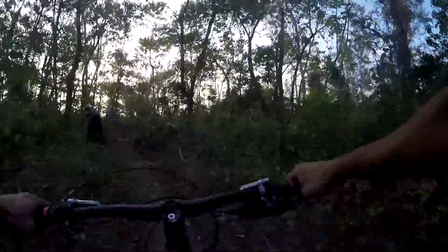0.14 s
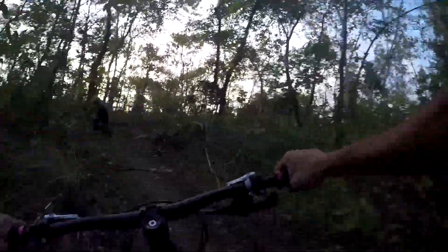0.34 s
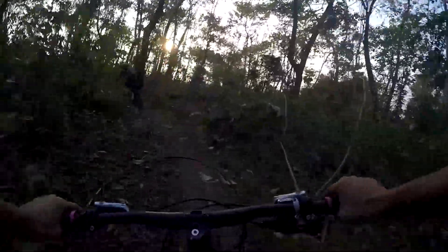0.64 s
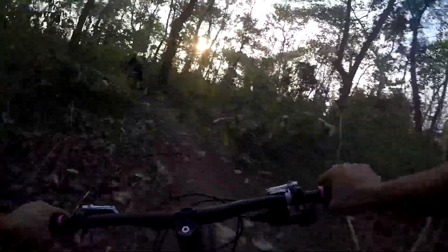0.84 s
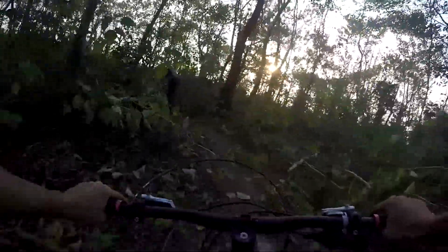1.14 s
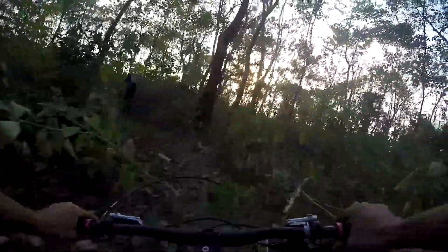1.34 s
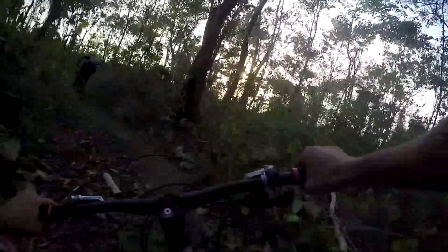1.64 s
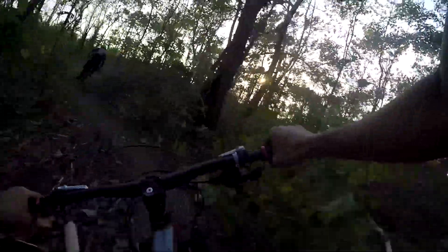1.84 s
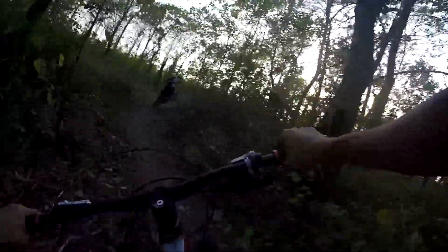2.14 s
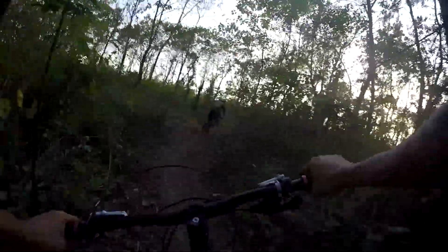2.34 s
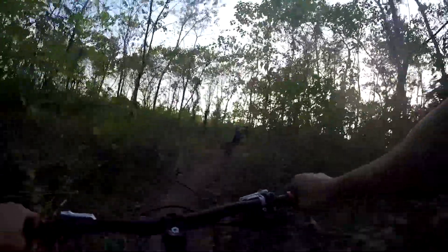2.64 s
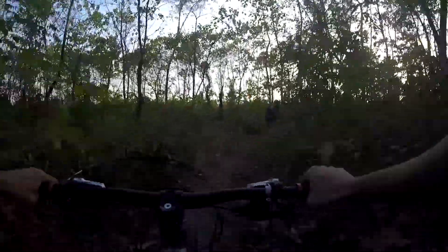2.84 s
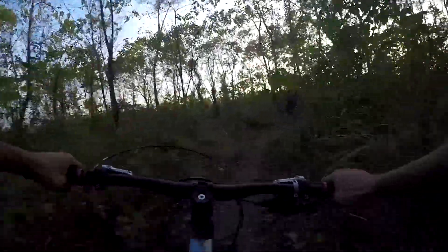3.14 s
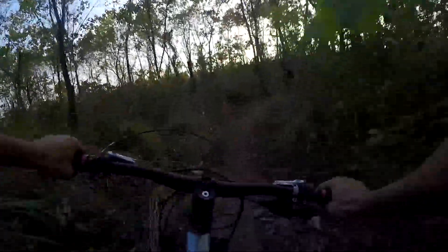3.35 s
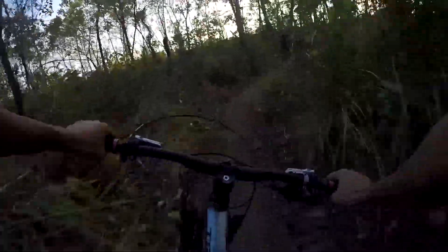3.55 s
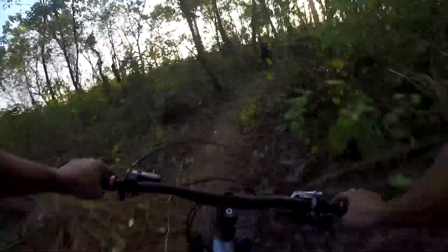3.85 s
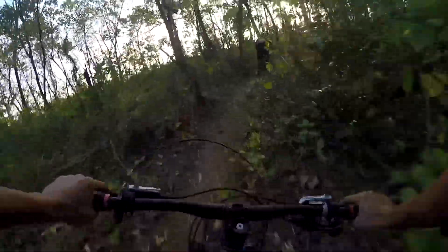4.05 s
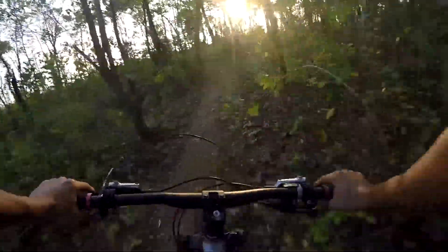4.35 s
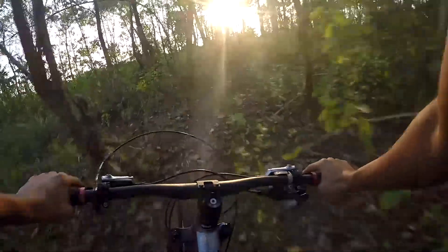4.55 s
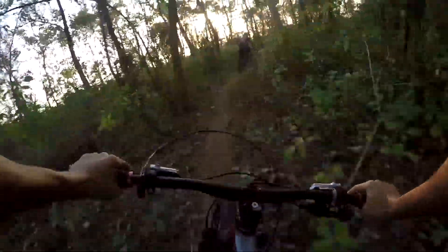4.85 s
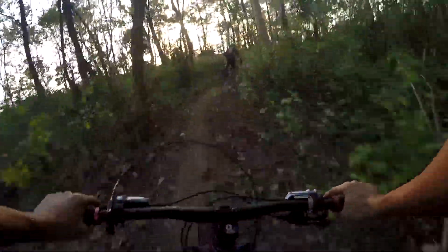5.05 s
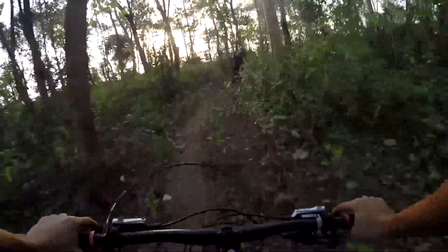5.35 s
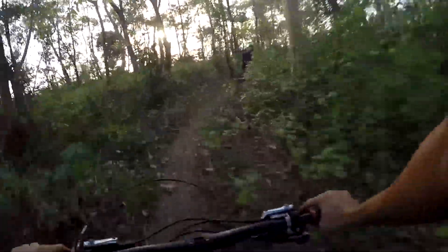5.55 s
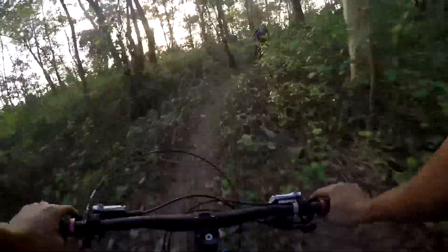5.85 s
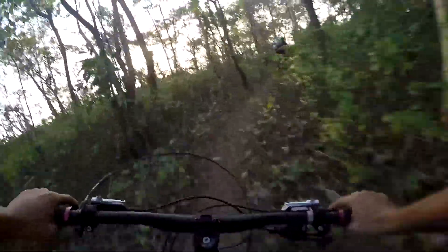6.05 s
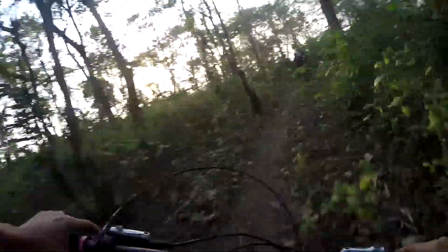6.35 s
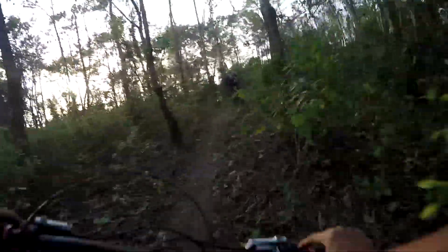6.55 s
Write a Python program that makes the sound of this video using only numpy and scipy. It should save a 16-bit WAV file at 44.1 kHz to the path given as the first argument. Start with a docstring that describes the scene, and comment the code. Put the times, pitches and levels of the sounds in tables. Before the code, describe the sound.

A mountain bike rides a rough dirt trail, heard close and without echo from the rider's chest. Throughout, the microphone rumbles and thumps deeply about three times a second, strongest near 1.9, 3.2, 4.6 and 5.9 seconds. Underneath, tyres crunch softly over grit, pebbles and dry leaves, with a faint hiss. The frame knocks irregularly, with sharp hits around 0.3, 0.8 and 1 second. From 0.4 to 2.4 seconds the bike coasts, the freehub whirring quietly and the slack chain jingling. A hard clack and a dull fork clunk land at 2.3 to 2.4 seconds, and another knock at 2.8. Coasting resumes from 3.3 to 6.1 seconds, with dense chain rattle, knocks and short leaf swishes between 3.4 and 4.1. More knocks come around 4.8, a bright steel clink at 5.1, and a sharp clack at 6.2, with the ride continuing to about 6.7 seconds.

```python
"""A mountain bike rides down a rough dirt trail, heard from a camera worn on the rider's chest.
Tyres crunch and leaves brush past, each a sum of many tiny impacts. The shaken camera rumbles, sways,
and thumps evenly three times a second. While the pedals rest, the freehub's pawls whirr over their
ratchet and the slack chain jingles. Blows send bending waves through the frame as knocks, the chain
and fittings ring in damped modes, and the fork clunks at heavy hits."""
import sys
import numpy as np
from scipy import signal
from scipy.fft import rfft, irfft
from scipy.io import wavfile
from scipy.ndimage import uniform_filter1d

SR = 44100
rng = np.random.default_rng(int(sys.argv[2]) if len(sys.argv) > 2 else 0)


def generate_wav(signal):
    """Clip the signal to [-1, 1] and save it as 16-bit WAV at the path in sys.argv[1]."""
    frames = np.transpose(np.atleast_2d(signal))
    scaled = np.clip(frames, -1, 1) * 32767
    pcm = np.round(scaled).astype(np.int16)
    wavfile.write(sys.argv[1], SR, pcm)


N = 295029
TIME = np.arange(N) / SR

# how hard the bike runs over the ground: time_s, level_db
GROUND = [(0.0, -55.5), (0.58, -58.5), (0.95, -57), (1.25, -57), (1.9, -52), (2.08, -57), (2.31, -55),
          (2.63, -53), (2.98, -56), (3.61, -49.5), (4.32, -55), (4.79, -52.5), (5.65, -57.5), (6.18, -57),
          (6.54, -52.5), (6.69, -51.5)]
# spans in which the pedals rest: start_s, end_s, rise_s, fall_s, slack_jingle_db
COASTING = [(0.425, 2.414, 0.048, 0.056, -57.5), (3.3, 6.09, 0.15, 0.12, -55)]
# blows to the frame: start_s, level_db, pitch_hz
KNOCKS = [(0.316, -21.5, 654), (0.398, -45.5, 557), (0.44, -42, 1700), (0.653, -39.5, 730),
          (0.682, -42, 770), (0.761, -20.5, 960), (0.792, -25, 430), (0.812, -29.5, 550),
          (1.002, -35, 1310), (1.025, -16, 1960), (1.196, -29, 1424), (1.239, -30.5, 2010),
          (1.382, -31, 930), (1.429, -35.5, 950), (1.465, -33.5, 1500), (1.748, -28.5, 1930),
          (1.98, -32, 1600), (2.05, -32, 1110), (2.093, -36.5, 1310), (2.3, -14.5, 1353), (2.405, -29, 870),
          (2.426, -18.5, 1034), (2.464, -36.5, 430), (2.61, -34.5, 510), (2.714, -36, 600),
          (2.783, -39.5, 450), (2.7989, -17, 670), (2.888, -34, 2070), (3.001, -38, 1590),
          (3.047, -24.5, 1030), (3.335, -32, 700), (3.528, -37.5, 435), (3.567, -32, 610),
          (3.592, -28, 1910), (3.675, -34, 900), (3.729, -25.5, 860), (3.74, -29.5, 1190),
          (3.838, -17, 1110), (3.879, -25.5, 420), (3.894, -28.5, 664), (4.076, -19.5, 1730),
          (4.086, -30.5, 700), (4.361, -35, 1720), (4.384, -23.5, 610), (4.522, -36, 740),
          (4.669, -21, 1110), (4.796, -19.5, 1110), (4.846, -21.5, 710), (5.027, -38, 910),
          (5.035, -35.5, 690), (5.519, -24.5, 620), (5.746, -30.5, 614), (6.078, -26, 1870),
          (6.153, -25, 1020), (6.213, -19.5, 1280), (6.385, -31, 436), (6.424, -34, 1290),
          (6.509, -29, 1270), (6.667, -36.5, 900)]


def amp(db):
    """Amplitude ratio of a level in decibels."""
    return 10 ** (np.asarray(db) / 20)


def unit_rms(x):
    """Normalisation to rms 1."""
    return x / np.sqrt(np.mean(x ** 2) + 1e-20)


def unit_in_band(x, low_hz, high_hz):
    """Normalisation to rms 1 within one frequency band."""
    hz = np.fft.rfftfreq(N, 1 / SR)
    return x / np.std(irfft(rfft(x) * ((hz > low_hz) & (hz < high_hz))))


def add(mix, start_s, sound):
    """Superposition: a sound joins the mix at its start time."""
    part = mix[max(round(start_s * SR), 0):][:len(sound)]
    part += sound[:len(part)]


def band(x, low_hz, high_hz):
    """Butterworth band-pass filter."""
    return signal.sosfilt(signal.butter(2, [low_hz, high_hz], "band", fs=SR, output="sos"), x)


def coloured(x, spectrum, size=16384):
    """Minimum-phase filter with a spectrum given as rows of frequency_hz, gain_db."""
    hz, db = np.transpose(spectrum)
    bins_hz = abs(np.fft.fftfreq(size, 1 / SR))
    log_gain = np.log(amp(np.interp(np.log(bins_hz + 1), np.log(hz + 1), db)) + 1e-6)
    response = np.fft.ifft(np.exp(np.conj(signal.hilbert(log_gain)))).real
    return signal.oaconvolve(x, response[:size // 2])[:N]


def level(curve):
    """Amplitude envelope interpolated through rows of time_s, level_db."""
    time_s, db = np.transpose(curve)
    return amp(np.interp(TIME, time_s, db))


def swell(surges):
    """Amplitude envelope as a sum of Gaussian surges."""
    return sum(amp(db) * np.exp(-(2 * (TIME - centre) / length) ** 2) for centre, db, length in surges)


def ground_drive(exponent):
    """Power law: a gain near 1 that follows the run over the ground."""
    return unit_rms(level(GROUND)) ** exponent


def coasting(start_s, end_s, rise_s, fall_s):
    """Trapezoidal gate: 1 while the pedals rest, 0 while they drive."""
    return np.clip(np.minimum((TIME - start_s) / rise_s, (end_s - TIME) / fall_s), 0, 1)


def wander(top_hz):
    """Slow random fluctuation: low-passed noise of rms 1."""
    slow = np.fft.rfftfreq(N, 1 / SR) < top_hz
    return unit_rms(irfft(rfft(rng.standard_normal(N)) * slow, N))


def grains(per_s, spread_db):
    """Poisson process of clicks, mostly small, a few large; rms 1."""
    size = amp(spread_db * np.minimum(rng.exponential(1, N), 4.5))
    return unit_rms(size * rng.choice([-1, 1], N) * (rng.random(N) < per_s / SR))


def ring(modes, t, weights):
    """Free vibration: a weighted sum of decaying modes in random polarity."""
    weights = weights * rng.choice([-1, 1], len(modes))
    return sum(weight * amp(db - 60 * t / t60) * np.sin(2 * np.pi * hz * t)
               for weight, (hz, db, t60) in zip(weights, modes))


def thud(hz, decay_s):
    """A heavily damped oscillator gives one dull push; peak 1."""
    t = np.arange(SR // 12) / SR
    sound = np.sin(2 * np.pi * hz * t) * np.exp(-t / decay_s) * (1 - np.exp(-t * hz))
    return sound / sound.max()


def rocking(blows, rise_s=0.013, decay_s=0.024):
    """Envelope of damped motion: the camera rocks on briefly after each blow (start_s, level_db)."""
    out, t = np.zeros(N), np.arange(SR) / SR
    for start_s, db in blows:
        add(out, start_s, amp(db) * np.minimum(t / rise_s, 1) * np.exp(-t / decay_s))
    return out


def camera(first_thump_s=0.2555, period_s=0.3305, crest_s=0.018, settle_hz=28, glide_s=0.032):
    """Forced vibration: the camera rumbles, and its mount thumps evenly, perhaps to the rider's pulse."""
    # spectrum of the rumble: frequency_hz, gain_db
    spectrum = [(9, -36), (15, 3), (30, 1.5), (42, -11), (58, -13), (85, -17), (130, -61.5), (300, -97),
                (600, -100)]
    # continuous shaking: time_s, level_db
    shake = [(0.0, -44), (0.8, -33), (1.04, -31), (1.23, -39), (1.73, -29.5), (1.93, -31), (2.25, -38.5),
             (2.76, -31), (4.55, -34), (5.07, -42), (5.5, -32), (5.85, -31), (6.07, -38.5), (6.69, -32)]
    # each thump in turn, the second of every four the strongest: level_db
    thumps_db = [-19.5, -12.5, -18, -23, -21.5, -5.5, -18, -20, -13, -3.5, -13.5, -21, -24.5, -7.5, -19.5,
                 -29, -18, -6, -11, -30]
    rumble = coloured(rng.standard_normal(N), spectrum)
    rumble /= np.sqrt(uniform_filter1d(rumble ** 2, size=3000) + 1e-20)  # hold its running rms at 1
    thumps = [(first_thump_s + k * period_s, db) for k, db in enumerate(thumps_db)]
    rock = np.hypot(amp(-8.5) * rocking(thumps), amp(-3.5) * rocking(row[:2] for row in KNOCKS))
    out = np.hypot(amp(5) * level(shake), rock) * rumble
    t = np.arange(SR // 3) / SR
    push = (t / crest_s * np.exp(1 - t / crest_s)) ** 2.5
    for start_s, db in thumps:
        start_hz = 47.9 * 2 ** (-(db + 11.5) / 28.5)  # an octave deeper for every 28.5 dB harder
        turns = np.cumsum(settle_hz + (start_hz - settle_hz) * np.exp(-t / glide_s)) / SR
        add(out, start_s, amp(db - 1) * push * np.sin(2 * np.pi * turns))
        add(out, start_s + 0.0062, amp(-31) * thud(hz=101, decay_s=0.0074))
    return out


def tyres(drone_db=-53, twig_db=-14):
    """Shot noise: grit and leaves crackle under the tread, twigs snap, and knobs drum on the dirt."""
    # spectra of the crunch and of the knobs' drone: frequency_hz, gain_db
    crunch_spectrum = [(200, -20), (500, -3.5), (740, -1), (1050, 1.5), (1400, 3.5), (1650, 0), (1930, 2),
                       (2300, -5), (3900, -5.5), (4900, -20), (8000, -28.5), (15000, -59)]
    drone_spectrum = [(40, -16), (110, 9), (190, 0), (300, -8.5), (500, -17.5), (900, -46.5), (3000, -27),
                      (8000, -80)]
    # sideways scuffs: centre_s, level_db, length_s
    scuffs = [(0.822, -49.5, 0.022), (0.913, -45, 0.15), (1.795, -46.5, 0.04), (2.39, -53, 0.096),
              (3.26, -47.5, 0.084), (4.071, -38, 0.012), (6.194, -46, 0.096), (6.48, -47, 0.24)]
    grip = np.hypot(amp(-1) * level(GROUND), swell(scuffs))
    grit = (grains(per_s=1100, spread_db=1) + rng.standard_normal(N)) * amp(2.96 * wander(35))
    knobs = grains(per_s=450, spread_db=3) * ground_drive(0.84)
    twigs = amp(twig_db) * grains(per_s=35, spread_db=3.5)
    crunch = unit_in_band(coloured(unit_rms(grit) + twigs, crunch_spectrum), 640, 1680)
    drone = unit_in_band(coloured(knobs, drone_spectrum), 151, 340)
    return grip * crunch + amp(drone_db) * drone


def ticks(low_hz, high_hz, decay_cycles, per_s, pitches=30):
    """Sparse random impacts excite a bank of damped resonators; rms 1."""
    out, t = np.zeros(N), np.arange(SR // 20) / SR
    for hz in np.geomspace(low_hz, high_hz, pitches):
        hits = (rng.random(N) < per_s / pitches / SR) * amp(4 * np.minimum(rng.exponential(1, N), 3))
        tick = np.sin(2 * np.pi * hz * t) * np.exp(-t * hz / decay_cycles)
        out += signal.oaconvolve(hits, tick)[:N]
    return unit_rms(out)


def small_impacts():
    """Small bodies ring high and briefly: pebbles and dry leaves under the tyres, and slack links."""
    pebbles = amp(-8) * ticks(890, 2040, decay_cycles=8.2, per_s=60)
    leaves = amp(-21) * ticks(4500, 11000, decay_cycles=6.6, per_s=98)
    links = amp(-58) * ticks(2584, 4280, decay_cycles=9.8, per_s=59)
    slack = sum(coasting(*span) for *span, _ in COASTING)
    return level(GROUND) * (pebbles + leaves) + slack * ground_drive(0.8) * links


def hiss(db=-67.5):
    """Stationary filtered noise makes a soft, even hiss."""
    # spectrum of the hiss: frequency_hz, gain_db
    spectrum = [(1000, -7), (3900, 11.5), (4900, 0.5), (6200, -1), (7500, 0.5), (8800, -2.5), (12000, -3),
                (15500, -12)]
    return amp(db) * unit_in_band(coloured(rng.standard_normal(N), spectrum), 3950, 18000)


def chain(taut_db=-61, snap_boost_db=15):
    """Colliding links: the chain jingles, most when slack, shakes in flurries and strikes steel."""
    # resonances of the links: frequency_hz, gain_db
    spectrum = [(1000, -30), (1700, -3), (1920, 1), (2250, -19.5), (2750, -5), (3050, -5), (3350, 0.5),
                (3620, -2), (3950, 1), (4400, -15), (5000, -20), (6500, -23), (7200, -18), (7520, -13.5),
                (7900, -25), (15000, -28)]
    # flurries of coarser hits: centre_s, level_db, length_s
    flurries = [(1.14, -44, 0.06), (1.538, -41, 0.0073), (1.61, -45, 0.14), (1.785, -40.5, 0.12),
                (1.845, -48, 0.045), (2.05, -47.5, 0.084), (3.462, -37, 0.033), (3.53, -48, 0.02),
                (3.645, -46, 0.022), (3.695, -43, 0.024), (3.82, -44, 0.036), (3.915, -45, 0.027),
                (3.975, -41, 0.031)]
    # strikes on steel: start_s, peak_db, decay_s, snap_db, place_fraction, tilt_db_per_octave
    strikes = [(0.1469, -29.5, 0.0066, -23, 0.28, 14), (1.586, -30, 0.0047, -26, 0.18, 2),
               (1.95, -28, 0.01, -21, 0.21, -8), (2.034, -27.5, 0.014, -28, 0.13, 2),
               (2.307, -24, 0.0071, -12, 0.2, 0), (2.4202, -27.5, 0.0092, -12, 0.22, -7),
               (2.7215, -24, 0.0046, -46, 0.26, -8), (3.4488, -25.5, 0.022, -18, 0.27, -19),
               (3.609, -28, 0.0028, -30, 0.47, -22), (3.627, -30.5, 0.018, -28, 0.15, -4),
               (3.763, -30, 0.0037, -22, 0.19, 0), (3.802, -32, 0.02, -24, 0.24, -3),
               (3.867, -25, 0.014, -26, 0.17, -4), (3.9004, -26.5, 0.015, -26, 0.15, 0.5),
               (3.963, -30, 0.013, -30, 0.2, -7), (4.059, -34, 0.0024, -26, 0.18, 0),
               (4.7023, -24.5, 0.0048, -24, 0.22, 1), (5.0673, -14.5, 0.0065, -16.5, 0.19, -0.5),
               (5.102, -30.5, 0.0025, -33, 0.07, 2), (5.3234, -23.5, 0.0029, -19, 0.21, -4),
               (5.3402, -22.5, 0.0028, -13, 0.21, -10.5), (6.553, -26, 0.0058, -10, 0.24, 9)]
    links = grains(per_s=2200, spread_db=3) * amp(2.16 * wander(39))
    jingle = unit_in_band(coloured(links, spectrum), 2800, 5200)
    slack = sum(amp(db) * coasting(*span) for *span, db in COASTING)
    out = (amp(taut_db) + slack) * ground_drive(0.84) * jingle
    slaps = grains(per_s=1100, spread_db=2.5)
    out += amp(0.5) * swell(flurries) * unit_in_band(coloured(slaps, spectrum), 2800, 5200)
    for start_s, db, decay_s, snap_db, place, tilt in strikes:
        add(out, start_s, amp(db) * clink(decay_s, snap_db + snap_boost_db, place, tilt))
    return out


def taps(per_s=22, candidates=240):
    """Random excitation: cables and small parts tap, harder on rough ground."""
    out, roughness = np.zeros(N), level(GROUND)
    for chance, size, pitch, when in zip(*rng.random((4, candidates))):
        sound = bending_pulse(420 * 4 ** pitch)
        if chance < per_s * TIME[-1] / candidates:
            gain = amp(7 + 5 * np.log(size + 0.018)) * roughness[int(when * N)]
            add(out, when * TIME[-1], gain * sound)
    return out


def clack(ring_db, snap_db, snap_decay_s=0.0015):
    """Impulse response: one hard contact gives a dry snap and rings the metal fittings."""
    # modes of the fittings: frequency_hz, level_db, t60_s
    modes = [(720, -6, 0.031), (1423, 7, 0.015), (1890, 1, 0.027), (2430, -20, 0.023), (3630, -1.5, 0.0089),
             (4130, 0.5, 0.015), (5120, -3.5, 0.017), (7000, -9.5, 0.019), (9500, -33, 0.0042)]
    t = np.arange(SR // 20) / SR
    tone = ring(modes, t, weights=1)
    snap = band(rng.standard_normal(len(t)) * np.exp(-t / snap_decay_s), 2500, 11000)
    return amp(ring_db) * tone / abs(tone).max() + amp(snap_db) * snap / abs(snap).max()


def knocks():
    """Knocks, coloured by hollow resonances of the camera's housing and mount, with thuds and clacks."""
    # resonances of the camera's housing and mount: frequency_hz, gain_db
    housing = [(100, 7), (300, 3.5), (440, 0.5), (640, 0.5), (735, 3), (850, -1), (1050, -1.5), (1400, 1.5),
               (1680, -4.5), (1910, 3), (2270, -8), (2600, 3), (4000, -23), (4900, -7), (5700, -24)]
    # contacts of the fittings, mostly at a knock: start_s, ring_peak_db, snap_peak_db
    clacks = [(0.036, -43, -43.5), (0.147, -49, -29), (1.0273, -23.5, -31), (1.197, -22, -28.5),
              (1.383, -27.5, -39), (1.939, -36, -40), (1.999, -43, -35.5), (2.052, -28, -49),
              (2.3012, -14, -22), (2.426, -28, -33.5), (4.509, -34, -36), (4.671, -32, -43),
              (5.0682, -28, -23), (6.155, -34, -49), (6.163, -49, -45), (6.2138, -17, -28.5)]
    blows, direct = taps(), np.zeros(N)
    for start_s, db, hz in KNOCKS:
        add(blows, start_s - 0.001097, amp(db + 2) * bending_pulse(hz))  # lands just before it is heard
        thud_db = db - 9.5 - 6.5 * np.log2(hz / 684)  # a soft, low blow carries more thud
        add(direct, start_s, amp(thud_db) * thud(hz=158.6, decay_s=0.003))
    for start_s, ring_db, snap_db in clacks:
        add(direct, start_s, clack(ring_db, snap_db))
    return coloured(blows, housing) + direct


def brushing_leaves():
    """Dense tiny impacts merge into dry swishes as leaves and stalks sweep the bike."""
    # swishes: centre_s, level_db, length_s
    swishes = [(0.134, -44.5, 0.021), (0.352, -46.5, 0.042), (0.727, -43.5, 0.015), (1.125, -50, 0.029),
               (1.16, -42, 0.019), (1.373, -41.5, 0.0089), (3.43, -43.5, 0.022), (3.464, -40.5, 0.044),
               (3.695, -38, 0.032), (3.748, -40.5, 0.018), (3.98, -44, 0.042), (4.742, -36.5, 0.018),
               (4.77, -47, 0.0085), (6.57, -42, 0.028), (6.597, -41, 0.026)]
    # spectrum of the leaves: frequency_hz, gain_db
    spectrum = [(700, -26), (1900, 4), (2400, -0.5), (3900, 8.5), (5000, -4.5), (6300, -11), (7500, -8.5),
                (10500, -16), (15000, -21)]
    return swell(swishes) * unit_rms(coloured(grains(per_s=3000, spread_db=3), spectrum))


def clink(decay_s, snap_db, place, tilt_db_per_octave, contact_chance=0.21):
    """Modal excitation: dying chatter rings steel, sparing modes with a node where it strikes; peak 1."""
    # modes of the drivetrain: frequency_hz, level_db, t60_s
    modes = [(1922, -7.5, 0.033), (2630, -12, 0.021), (3327, -0.5, 0.028), (3900, 8, 0.013),
             (4050, -0.5, 0.013), (4530, 0.5, 0.0073), (5230, -23, 0.0046), (7300, -15.5, 0.022),
             (9200, -18, 0.0077), (10400, -47, 0.02)]
    t = np.arange(SR // 10) / SR
    contacts = rng.choice([-1, 1], len(t)) * (rng.random(len(t)) < contact_chance) * np.exp(-t / decay_s)
    shapes = np.sin(np.pi * place * (1 + np.arange(len(modes))))
    hardness = amp(tilt_db_per_octave * np.log2(np.array(modes)[:, 0] / 3600))  # harder rings higher
    tone = ring(modes, t, shapes * hardness)
    snap = amp(snap_db) * band(rng.standard_normal(len(t)) * np.exp(-t / 0.00086), 740, 9500)
    sound = signal.fftconvolve(contacts, tone + snap)[:len(t)]
    return sound / abs(sound).max()


def swaying(sway_hz=22, unsteadiness=0.2486):
    """Low-frequency oscillation: the camera swings on its straps through each dip in the trail."""
    # dips: centre_s, peak_db, length_s
    dips = [(0.25, -17, 0.14), (0.655, -14.5, 0.14), (0.79, -16.5, 0.076), (1.57, -18, 0.14),
            (1.82, -13.5, 0.15), (1.96, -10, 0.11), (2.075, -11, 0.043), (2.455, -13.5, 0.058),
            (2.66, -24, 0.094), (2.81, -16, 0.17), (3.3, -15, 0.056), (3.76, -16, 0.061),
            (5.11, -17.5, 0.15), (5.94, -18.5, 0.055)]
    turns = np.cumsum(sway_hz * (1 + unsteadiness * wander(14))) / SR
    return swell(dips) * np.sin(2 * np.pi * turns)


def bending_pulse(pitch_hz, travel_s=0.002606, echo_db=-31, echo_decay_s=0.0082):
    """Dispersion: high bending waves run faster along the frame, so a knock's pitch drops; peak 1."""
    t = np.arange(2048) / SR
    hz = np.fft.rfftfreq(len(t), 1 / SR)
    magnitude = (hz / pitch_hz * np.exp(1 - hz / pitch_hz)) ** 2.5
    lag_turns = 2 * travel_s * np.sqrt(hz * pitch_hz)  # wave speed grows with the root of frequency
    blow = irfft(magnitude * np.exp(-2j * np.pi * lag_turns), len(t))
    # joints and loose parts reflect the pulse
    echoes = amp(echo_db) * rng.standard_normal(len(t)) * np.exp(-t / echo_decay_s)
    sound = blow + signal.fftconvolve(blow, echoes)[:len(t)]
    return sound / abs(sound).max()


def freehub(teeth_per_s=340, db=-62, scrape=0.3):
    """Modulated noise: pawls slide up each ratchet tooth and drop off, as the wheel speed wavers."""
    # resonances of the pawls: frequency_hz, gain_db
    spectrum = [(700, -13), (1900, -7), (2300, -11), (2720, 8), (3100, 2), (3650, 0), (4000, 4),
                (4400, -10), (6300, -18), (7100, -19), (7550, -8), (8000, -13.5), (8800, -14.5),
                (9550, -6.5), (10000, -12.5), (10500, -9), (11400, -14.5), (13600, -8.5), (14100, -18),
                (15200, -11)]
    teeth = np.cumsum(teeth_per_s * (1 + 0.052 * wander(4.8))) / SR
    tooth_envelope = scrape + np.exp(-(teeth % 1) / 1.1)
    drops = tooth_envelope * rng.standard_normal(N) * amp(1.9 * wander(130))
    whirr = unit_in_band(coloured(drops, spectrum), 7000, 13700)
    freewheeling = sum(coasting(*span) for *span, _ in COASTING)
    return amp(db) * freewheeling * ground_drive(0.32) * whirr


def fork():
    """Heavy damping: the fork takes the weight with a dull clunk when a wheel hits a root or rock."""
    # jolts: start_s, peak_db
    jolts = [(1.028, -31), (2.302, -27), (2.429, -20), (3.84, -31), (3.884, -25), (4.847, -24.5),
             (6.214, -34), (6.229, -38)]
    out = np.zeros(N)
    for start_s, db in jolts:
        add(out, start_s, amp(db) * thud(hz=235, decay_s=0.0019))
    return out


def scene():
    """Free field: in the open forest the close sources add without reverberation, in one channel."""
    mix = camera() + swaying() + tyres() + small_impacts() + brushing_leaves()
    return (mix + freehub() + chain() + knocks() + fork() + hiss())[None]


def record(dry, edge_hz=15350):
    """Band limit: a linear-phase low-pass filter removes the highest treble."""
    low_pass = signal.firwin(301, edge_hz, window=("kaiser", 9), fs=SR)
    return signal.oaconvolve(dry, low_pass[None], "same", axes=1)


dry = scene()
out = record(dry)
generate_wav(out)
```